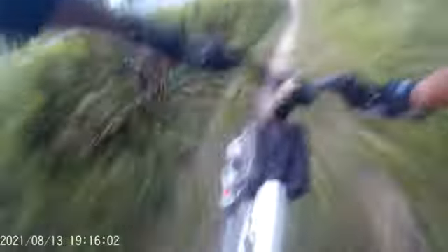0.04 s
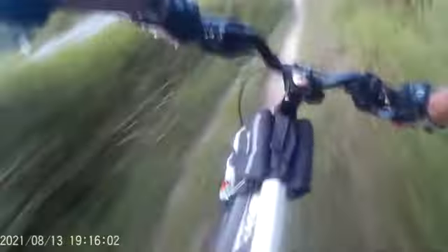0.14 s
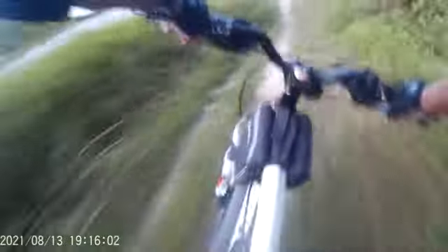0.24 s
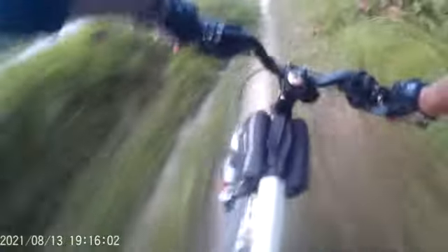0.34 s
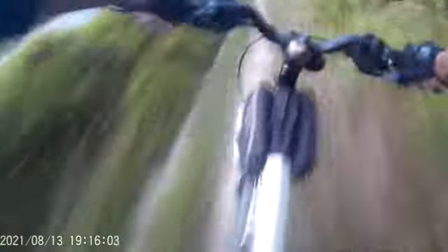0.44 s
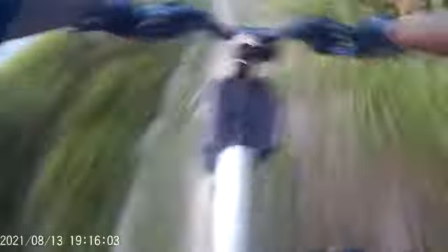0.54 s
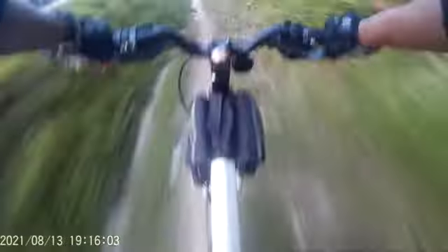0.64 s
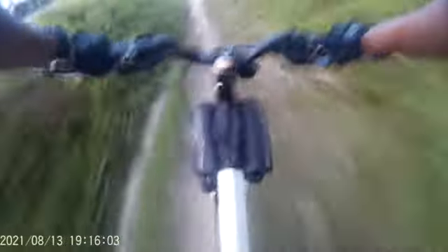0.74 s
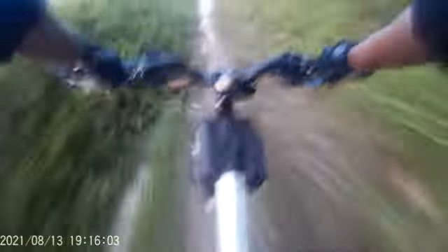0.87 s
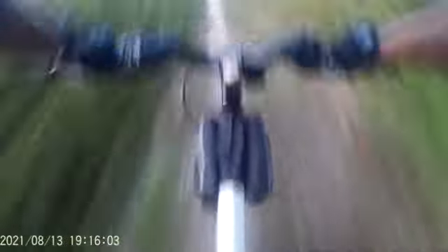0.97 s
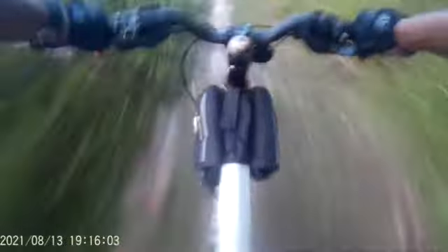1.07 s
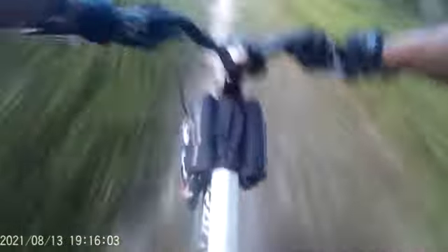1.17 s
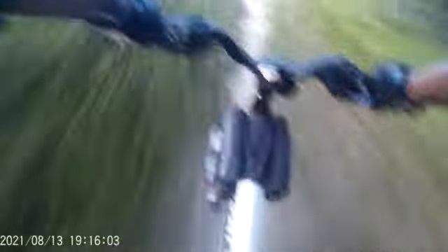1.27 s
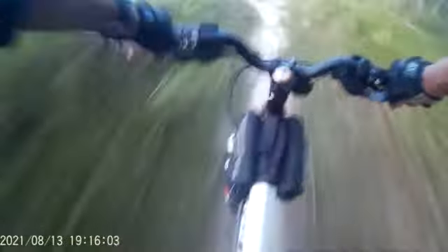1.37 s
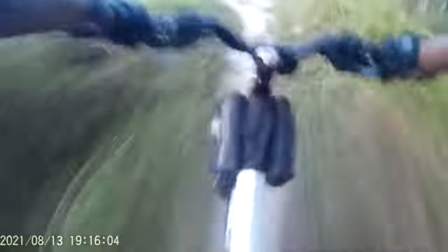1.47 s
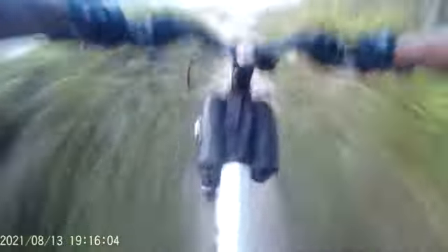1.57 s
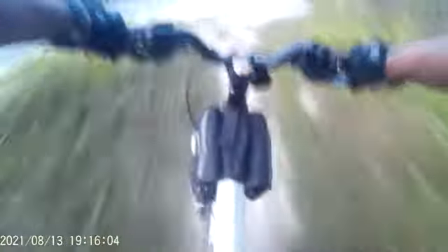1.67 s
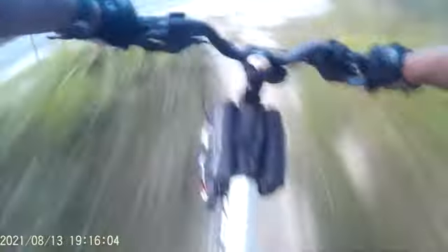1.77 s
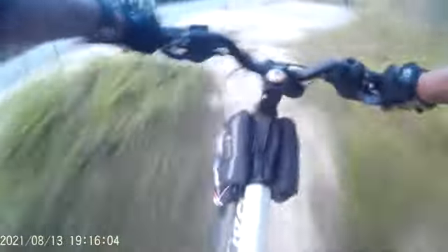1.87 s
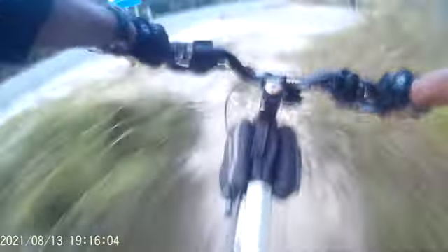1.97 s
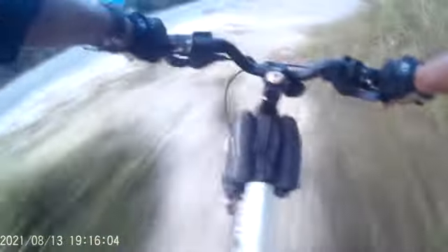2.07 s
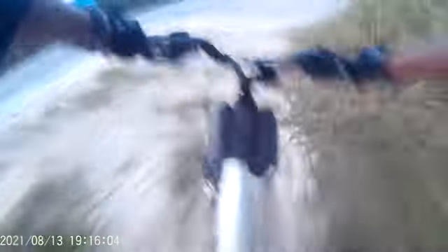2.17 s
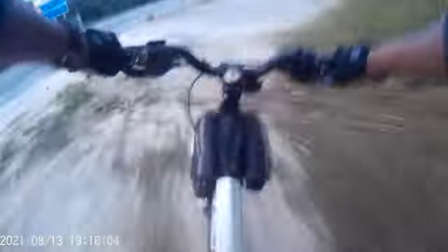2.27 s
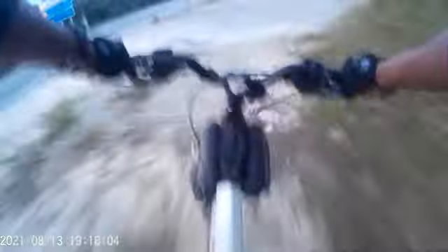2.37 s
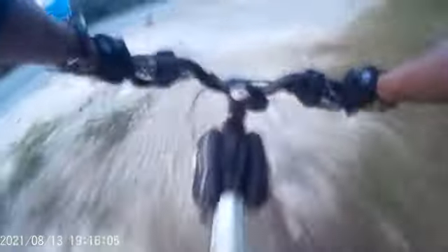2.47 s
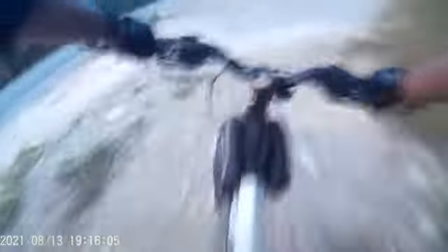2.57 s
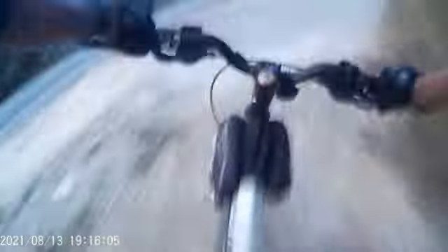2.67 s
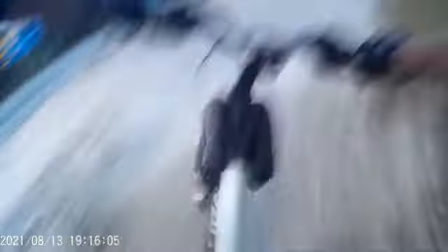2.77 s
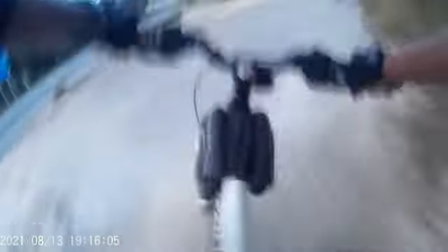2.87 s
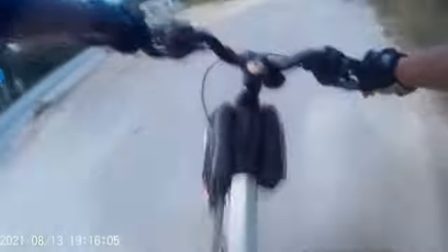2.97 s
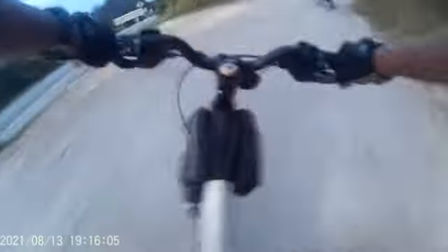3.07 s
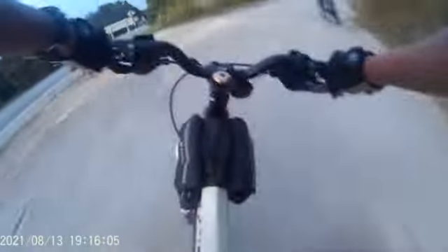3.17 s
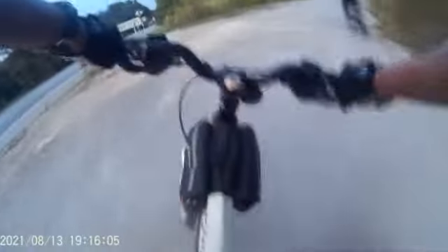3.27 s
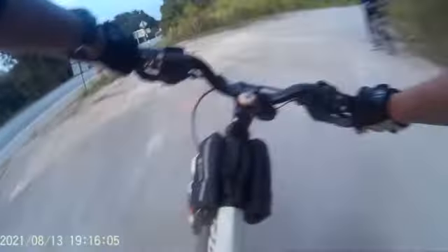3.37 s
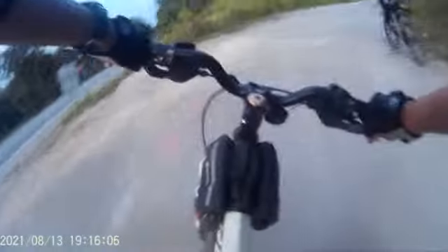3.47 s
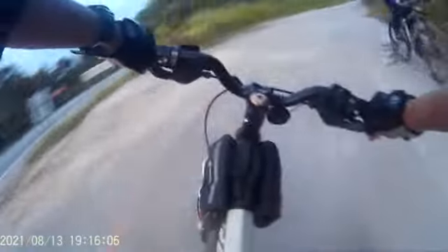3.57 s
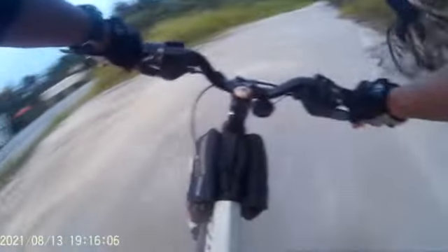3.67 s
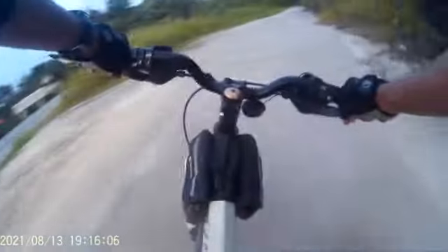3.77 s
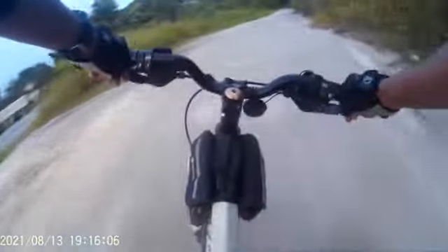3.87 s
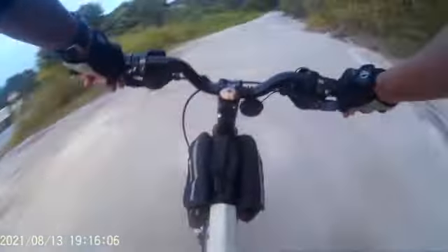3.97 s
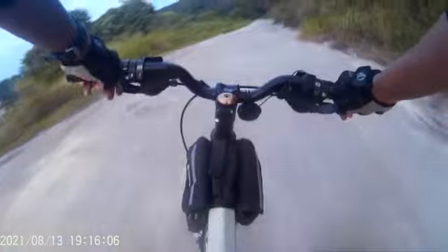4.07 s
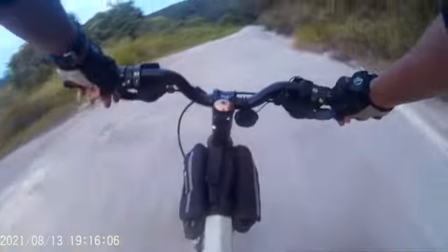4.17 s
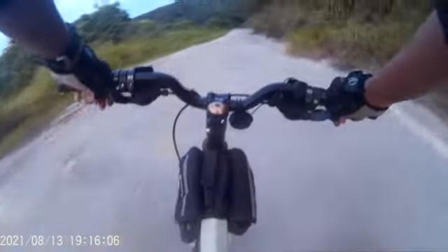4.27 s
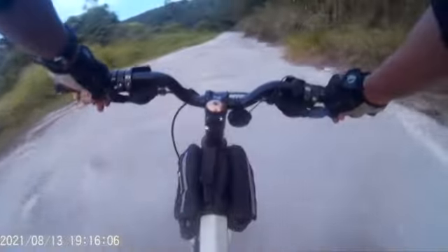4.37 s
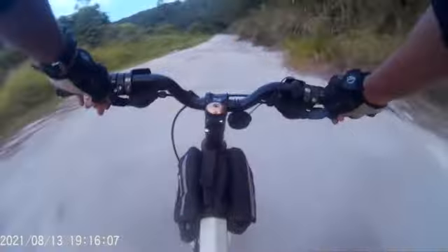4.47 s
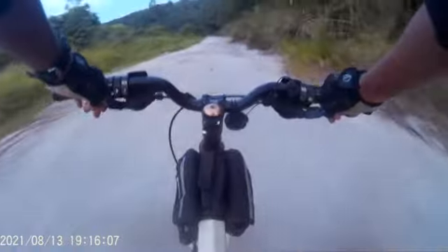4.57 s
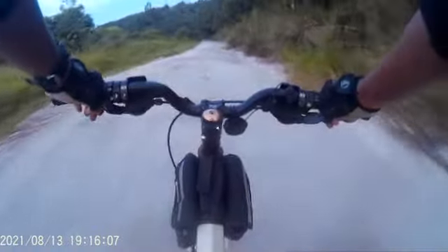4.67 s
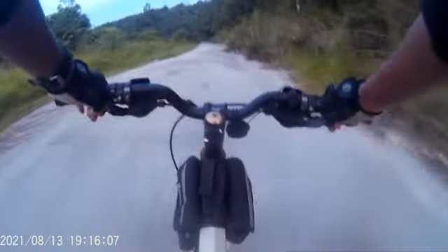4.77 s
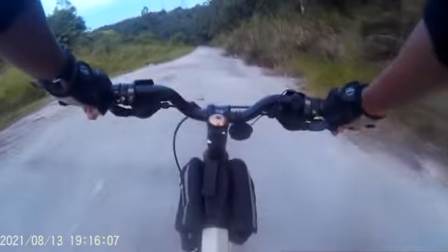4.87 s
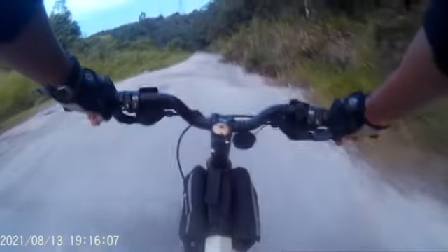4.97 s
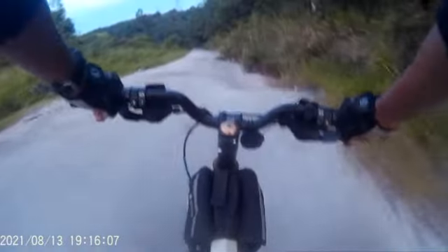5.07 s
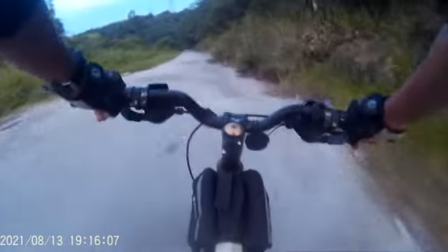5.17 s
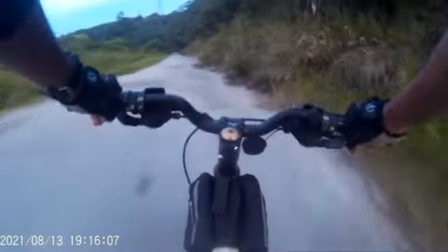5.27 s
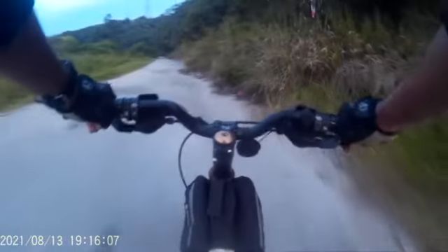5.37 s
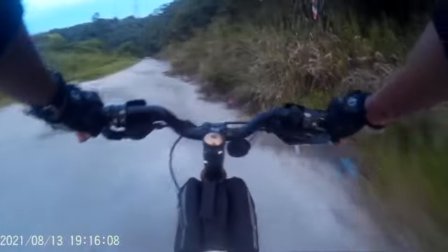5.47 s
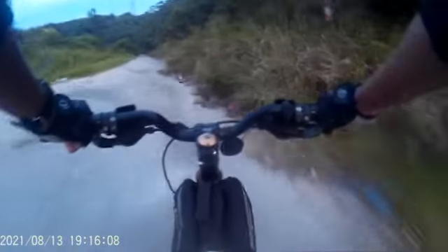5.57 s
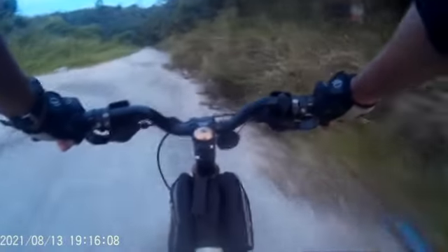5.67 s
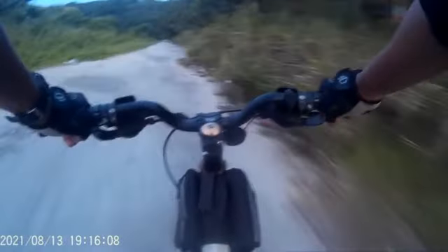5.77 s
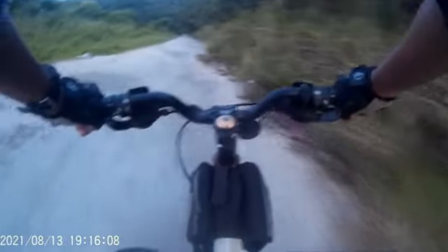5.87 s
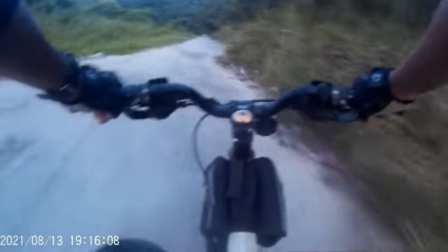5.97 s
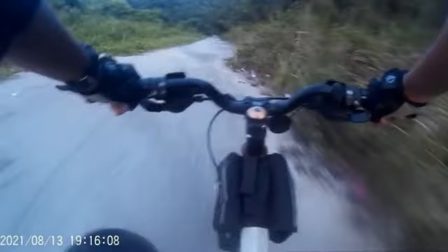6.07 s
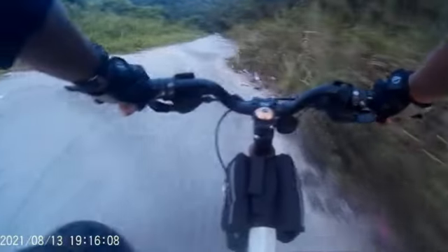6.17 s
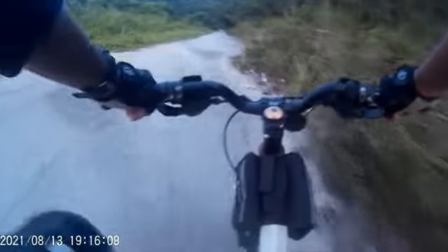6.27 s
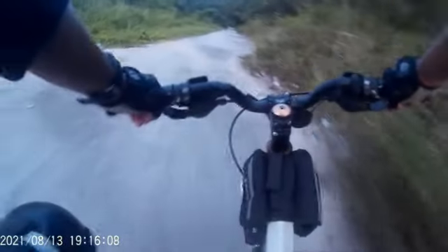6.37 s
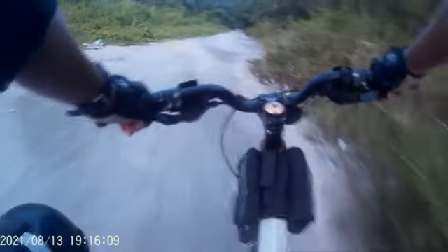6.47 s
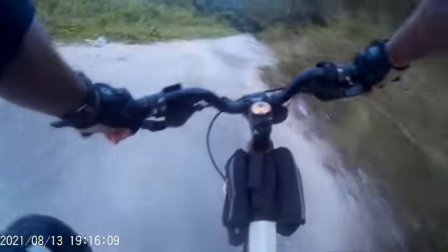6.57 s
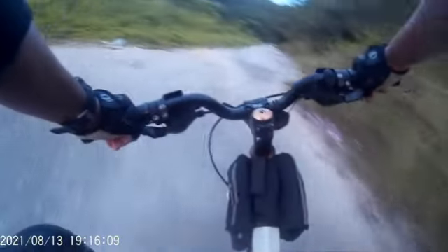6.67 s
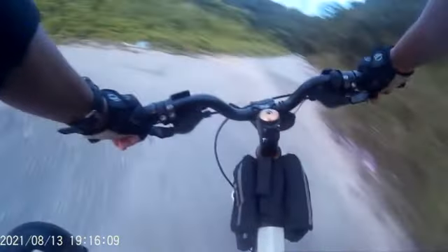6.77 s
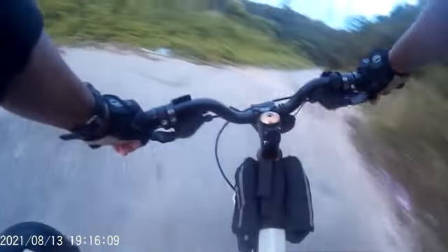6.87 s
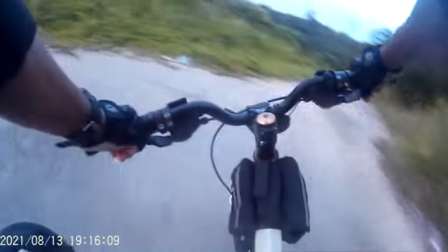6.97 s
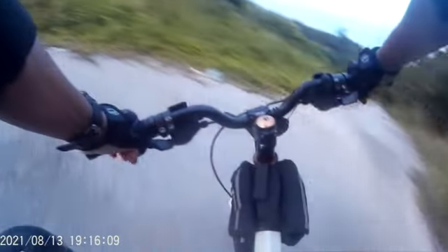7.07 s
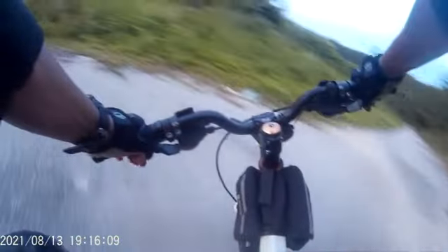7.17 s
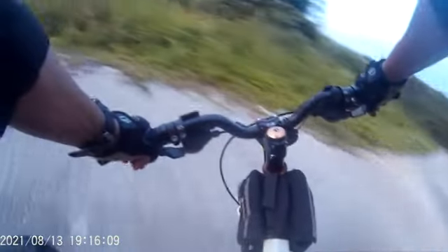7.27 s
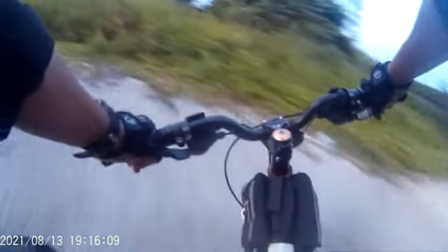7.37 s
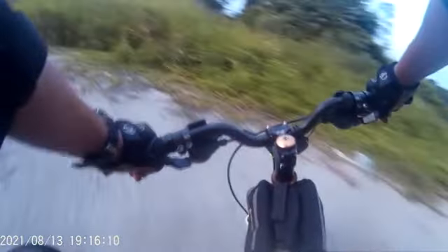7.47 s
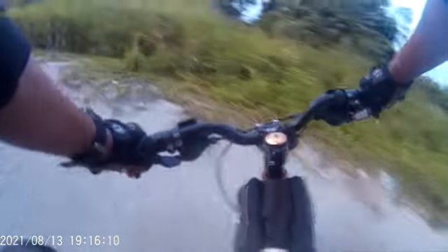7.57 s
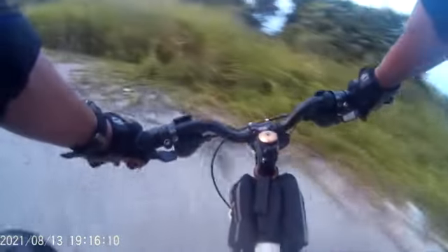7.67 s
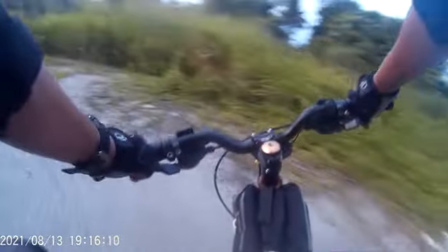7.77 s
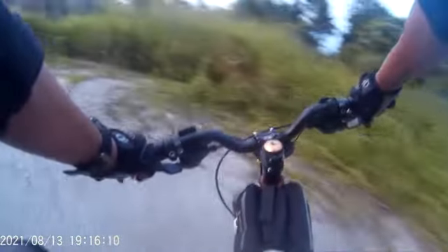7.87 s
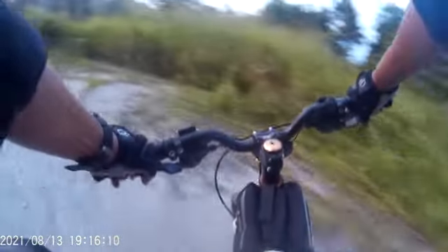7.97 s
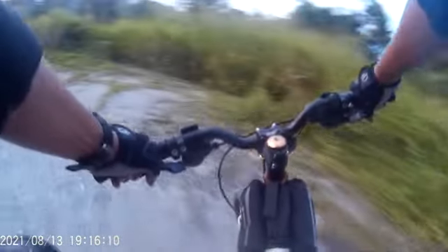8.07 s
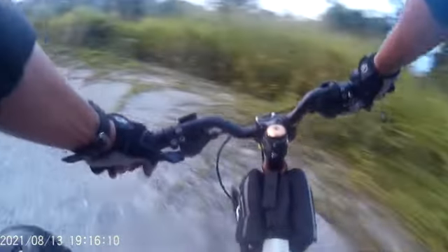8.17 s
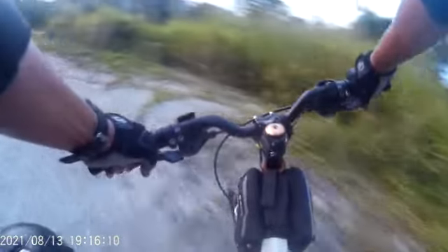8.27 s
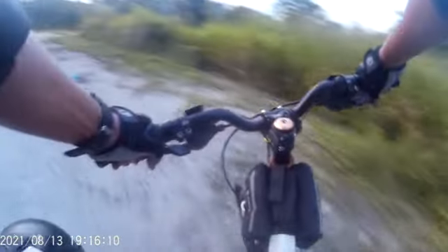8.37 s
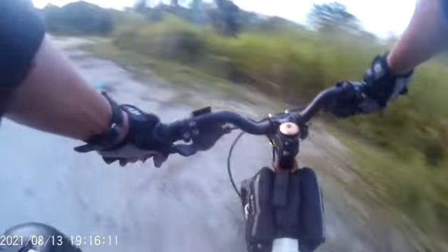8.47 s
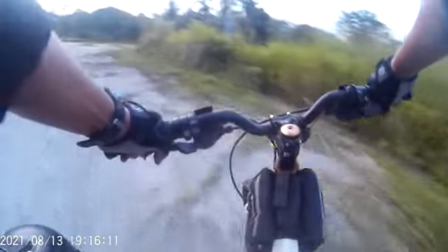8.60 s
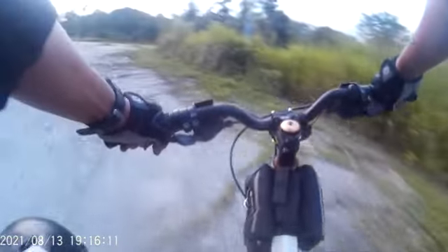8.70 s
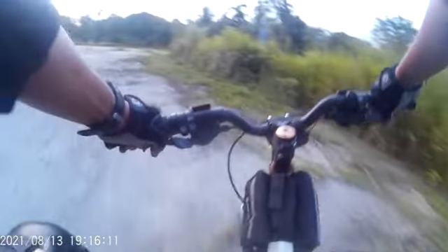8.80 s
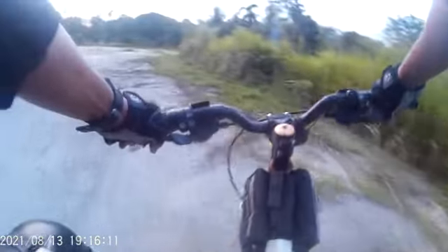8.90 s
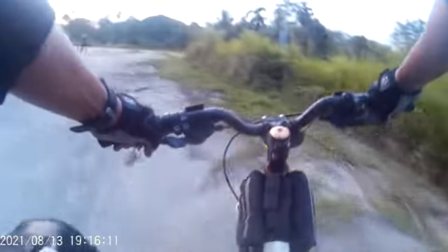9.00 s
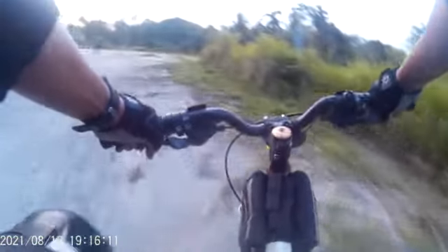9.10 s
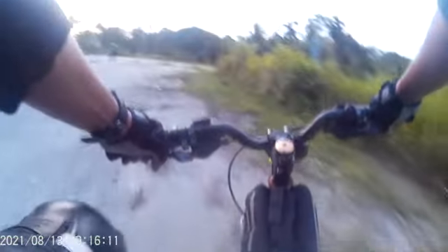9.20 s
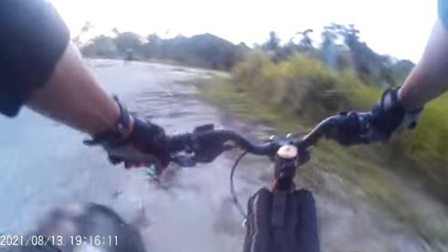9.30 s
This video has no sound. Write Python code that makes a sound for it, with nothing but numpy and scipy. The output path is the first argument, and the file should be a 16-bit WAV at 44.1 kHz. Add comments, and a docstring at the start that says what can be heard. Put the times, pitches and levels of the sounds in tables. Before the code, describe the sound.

A mountain bike runs down a rough dirt trail, heard from a camera on the rider's chest. Wind buffets the microphone while low thumps, hollow knocks and small chain snaps sound over the dull rush of tyres on grit. After about four seconds the thumps stop and the wind dies down. The bike rolls more quietly on concrete, with light knocks, ticking chain and a faint rubbing.

```python
"""A mountain bike runs down a rough dirt trail, then slows on concrete.
Its tyres rush over grit, its chain and cables snap, and bumps and stones knock. A camera on the
rider's chest hears it all through a case, which rings briefly at each knock and is buffeted by wind.
A thin insect-like whine and a faint hum come and go over the hiss of the microphone's amplifier."""
import sys
import numpy as np
from scipy import signal
from scipy.fft import rfft, irfft, next_fast_len
from scipy.io import wavfile
from scipy.ndimage import uniform_filter1d

SR = 44100
rng = np.random.default_rng(int(sys.argv[2]) if len(sys.argv) > 2 else 0)


def transcribe(signal):
    """Save signal, clipped to [-1, 1], as a 16-bit WAV file at the path in sys.argv[1]."""
    frames = np.atleast_2d(signal).T
    limited = np.clip(frames, -1, 1)
    pcm = np.round(limited * 32767).astype(np.int16)
    wavfile.write(sys.argv[1], SR, pcm)


N = 411894


# how loud and bright the rolling tyres are: t/s, level/dB, brightness/(dB per octave)
ROLLING = [(0.0, -47, -7), (0.36, -41, -8), (0.55, -48.5, 2), (1.06, -45.5, 6), (2.5, -42.5, -4),
           (2.7, -37.5, -14), (2.88, -45, 5), (3.28, -52, 25), (3.72, -43.5, 7), (4.16, -49, 12),
           (4.92, -48, -1), (6.11, -47.5, 10), (7.36, -49.5, -9), (7.86, -52, -9), (8.19, -49.5, -10),
           (8.43, -45.5, -15), (8.92, -47, 4), (9.34, -41, -7)]
# how much loose gravel pops under the tread: t/s, level/dB
GRAVEL = [(0, -3), (2.9, 0), (3.3, -1), (5.4, 1), (7.4, -5.5), (7.5, -21), (8.15, -34), (8.25, -10),
          (9.34, -3)]
# the broad pitch ranges that the case lets through: f/Hz, level/dB, width/Hz
RUSH_BANDS = [(774, -6.5, 340), (1093, 5.5, 825), (1394, -4.5, 550), (1610, -3.5, 590), (1850, -14, 430)]
# the tone of crackling gravel: f/Hz, level/dB
CRACKLE_TONE = [(600, 11), (1300, 4.5), (2000, -8), (2600, 0.5), (3600, 0.5), (4200, -1), (4700, -9),
                (8000, -17), (15000, -37)]

def tyres():
    """Rolling tyres rush, dulled by the case; gravel popping under the tread feeds rush and crackle."""
    rush_db, bright_db = curves(ROLLING)
    gravel = grains(per_s=90, spread_db=3.5, length_s=0.0041) * undb(curves(GRAVEL)[0])
    contact = (rng.standard_normal(N) + undb(0.5) * gravel) * undb(wander(18))
    rush = np.zeros(N)
    for hz, db, width in RUSH_BANDS:
        band_db = db + bright_db * np.log2(hz / 1300) + 0.22 * wander(47)
        rush += undb(band_db) * unit(band(band(contact, hz, width), hz, width))
    closed_case = signal.butter(4, 1774, fs=SR, output="sos")
    rush = signal.sosfilt(closed_case, rush / np.sqrt(len(RUSH_BANDS)))
    crackle = colour(gravel + undb(1) * rng.standard_normal(N), CRACKLE_TONE)
    crackle_db = -14 + 0.18 * bright_db  # a brighter rush crackles more
    return undb(rush_db) * (rush + undb(crackle_db) * crackle)


# patches of loose stones: start/s, end/s, level/dB
SCRAPES = [(1.347, 1.393, -40), (1.471, 1.515, -36), (2.527, 2.61, -45.5), (2.612, 2.8, -47)]
# the tone of their crunch: f/Hz, level/dB
CRUNCH_TONE = [(500, -23), (900, 7), (1800, 1), (2300, -17), (4000, -14.5), (8000, -24.5), (16000, -40)]

def scrapes():
    """A tyre ploughs through stones: a crunch of tiny contacts starts at once and tapers off."""
    t = np.arange(N) / SR
    crunch = colour(grains(per_s=1100, spread_db=1.5, length_s=0.0025), CRUNCH_TONE)
    level = np.zeros(N)
    for start, end, db in SCRAPES:
        taper = np.sqrt(np.clip((end - t) / (end - start), 0, 1))
        level += undb(db) * spell(start, np.inf, fade_s=0.004) * taper
    return level * crunch


# knocks from bumps and stones: t/s, level/dB, centre/Hz, boost of the low notes/dB
KNOCKS = [(0.3418, -27, 1040, 0), (0.4674, -23, 900, -12), (0.794, -35, 1020, 6), (0.829, -16.5, 1090, 0.5),
          (0.956, -29.5, 1000, -4), (1.3484, -30.5, 1190, -14), (1.387, -25.5, 1220, -28),
          (1.4751, -27, 926, -2.5), (1.4873, -22, 1030, -17), (1.513, -25, 902, -11),
          (1.94, -26.5, 1020, -0.5), (2.0218, -24, 1810, 6), (2.1145, -26.5, 1020, -5),
          (2.2142, -20, 1040, -7.5), (2.589, -23.5, 1120, -8), (2.6297, -25.5, 1460, -17),
          (2.6448, -20.5, 1060, -2), (2.7512, -26.5, 1620, 2), (2.846, -28.5, 910, -8),
          (3.1096, -27, 926, -3), (3.2681, -29.5, 1780, -1), (3.401, -30, 1066, -20),
          (4.6465, -29, 1180, -3), (4.8533, -29, 1030, -3), (4.8763, -29.5, 1060, -9),
          (4.9874, -34.5, 1660, -17), (5.323, -32, 1140, -10), (5.3538, -24.5, 1204, -9),
          (5.404, -31.5, 1160, -5.5), (5.616, -31.5, 1590, -8.5), (5.8453, -31.5, 1240, -18),
          (6.114, -34, 1800, -19), (6.134, -27.5, 1530, -20), (6.381, -32.5, 1410, -22),
          (6.793, -29, 1480, -31), (6.819, -32.5, 1460, -20), (7.15, -33.5, 1200, -8),
          (7.256, -37, 1500, -10), (7.313, -34, 1500, -12), (7.345, -33, 1150, -14),
          (7.441, -34.5, 1453, -21), (8.205, -34.5, 1626, -4.5), (8.212, -31.5, 1630, -11),
          (8.477, -33.5, 1590, -8), (6.961, -37, 1850, -19), (8.3487, -30, 1100, -11),
          (8.373, -33, 1250, -12), (8.4033, -25.5, 1510, -12), (8.5444, -29.5, 1590, -16),
          (9.0986, -23, 1025, -9.5), (9.185, -30, 1800, -16), (8.508, -35.5, 1500, -11),
          (8.6038, -36, 1700, -12), (8.718, -39, 1500, -16), (9.044, -36, 2000, -18),
          (9.162, -31, 1900, -20), (9.2542, -37, 1700, -15)]
# the notes the case rings with: f/Hz, level/dB, time to fade by 60 dB/s
CASE_NOTES = [(358, 4.5, 0.0079), (493, 1.5, 0.011), (707, -13, 0.035), (1110, -5.5, 0.021),
              (1400, 3, 0.0046), (1605, -5, 0.017), (1800, -7, 0.026)]

def knocks():
    """Each knock is a tiny rattle that cracks and rings the case, a little differently each time."""
    t = np.arange(2048) / SR
    hz, db, ring_s = np.transpose(CASE_NOTES)[:, :, None]
    fade = undb(-60 * t / ring_s) * (1 - np.exp(-t / 0.0021))
    jolts = rng.standard_normal((len(KNOCKS), 256)) * t[:256] * np.exp(-t[:256] / 0.0007)
    chance = rng.standard_normal((len(KNOCKS), 2, len(CASE_NOTES), 1))
    crack_band = signal.butter(4, [750, 2430], "band", fs=SR, output="sos")
    events = []
    for (s, level_db, centre_hz, low_db), jolt, (louder, higher) in zip(KNOCKS, jolts, chance):
        notes = np.sin(2 * np.pi * hz * (1 + 0.04 * higher) * t) * fade
        rings = signal.fftconvolve(notes, jolt[None], axes=1)
        rings /= np.abs(rings).max(axis=1, keepdims=True)
        near_db = -12 * np.abs(np.log2(hz / centre_hz))  # weaker away from the knock's centre
        boost_db = np.where(hz < 800, low_db, near_db)
        sound = np.sum(undb(db + boost_db + 1.5 * louder) * rings, axis=0)
        crack = signal.sosfilt(crack_band, jolt)
        sound[:len(crack)] += undb(-11.5) * crack / np.abs(crack).max()
        events.append((s, undb(level_db) * sound))
    bass_cut = signal.butter(2, 200, "high", fs=SR, output="sos")  # a small case makes no deep bass
    return signal.sosfilt(bass_cut, place(events))


# bumps felt through the frame: t/s, level/dB, f/Hz
THUMPS = [(0.375, -8, 150), (0.457, -1, 229), (0.49, -5, 133), (0.661, -7, 184), (1.23, -7.5, 185),
          (2.757, -6.5, 137), (2.988, -12, 205), (3.105, -5.5, 128), (3.283, -1.5, 192), (3.738, -7.5, 119),
          (4.004, -8, 241)]

def thumps():
    """A bump comes through the frame as one or two slow pressure waves with a soft start."""
    t = np.arange(4096) / SR
    events = []
    for s, db, hz in THUMPS:
        cycles = hz * t
        swell = cycles * np.exp(1 - cycles / 0.39) / 1.28
        events.append((s, undb(db) * swell * np.sin(2 * np.pi * cycles)))
    return place(events)


# snaps of chain and cables: t/s, level/dB, brightness/(dB per octave)
SNAPS = [(0.467, -35, -2), (0.683, -44, -6), (1.517, -42, -10), (1.94, -38, -11), (2.135, -43.5, -10),
         (2.443, -48, -6), (2.877, -53, 10), (3.27, -59, -29), (5.8452, -52, -12), (6.134, -49, -21),
         (6.369, -54, -15), (6.196, -55, -19), (8.289, -54.5, -20), (8.403, -42, 15), (8.546, -50, -6),
         (9.1, -45, -13)]
# the notes the metal rings with: f/Hz, level/dB, time to fade by 60 dB/s
METAL_NOTES = [(2050, 4, 0.015), (2540, 5, 0.011), (3820, 10, 0.0059), (4550, 1.5, 0.011),
               (5630, 1, 0.0076), (7940, -16.5, 0.011)]

def snaps():
    """One sudden blow rings a few brief metal notes, tuned a little differently each time."""
    t = np.arange(1024) / SR
    hz, db, ring_s = np.transpose(METAL_NOTES)[:, :, None]
    rise = 1 - np.exp(-t / 0.00077)
    events = []
    for s, level_db, bright_db in SNAPS:
        tuning = 1 + 0.03 * rng.standard_normal(hz.shape)
        fade = undb(db + bright_db * np.log2(hz / 3800) - 60 * t / ring_s)
        notes = fade * np.sin(2 * np.pi * hz * tuning * t)
        events.append((s, undb(level_db) * rise * notes.sum(axis=0)))
    return place(events)


# a loose metal part: t/s, level/dB, f/Hz, time to fade by 60 dB/s
PING = [(1.4033, -20, 2510, 0.017)]

def ping():
    """A loose metal part gives one short, clean ring."""
    t = np.arange(4096) / SR
    rise = 1 - np.exp(-t / 0.0017)
    return place((s, rise * undb(db - 60 * t / ring_s) * np.sin(2 * np.pi * hz * t))
                 for s, db, hz, ring_s in PING)


# stretches of loose grit: start/s, end/s, level/dB, sharp part over dull part/dB
GRIT = [(1.879, 2.304, -51.5, -14), (4.193, 5.553, -54, -26), (6.604, 7.455, -55.5, -11),
        (8.202, 9.301, -56, -29)]
# bursts of chain chatter: start/s, end/s, level/dB
CHAIN_CHATTER = [(5.577, 5.666, -52.5), (5.711, 5.741, -50), (5.776, 5.867, -51), (5.903, 5.938, -50),
                 (5.972, 6.072, -51), (6.108, 6.196, -50), (6.235, 6.294, -53), (6.339, 6.426, -52)]

def frame_ticks():
    """Grit and chain links hit the frame at random, making many small ticks and a few bigger ones."""
    chain = [(*row, -30) for row in CHAIN_CHATTER]  # its sharp part is 30 dB weaker
    ticks = []
    for table, per_s, length_s in [(GRIT, 70, 0.005), (chain, 200, 0.0035)]:
        for start, end, db, sharp_db in table:
            for when, size in rng.random((int(per_s * (end - start)), 2)):
                tick_db = db - 2.8 * np.log(1 - 0.9 * size)
                ticks.append((start + when * (end - start), tick_db, sharp_db, length_s))
    return rough_bursts(ticks)


# things brushing by: t/s, level/dB, sharp part over dull part/dB
BRUSHES = [(0.342, -46.5, -5), (0.966, -56, -2), (1.402, -45, -8), (1.436, -56, -2), (2.534, -57, -3),
           (2.637, -53, -5), (2.66, -53, -3), (2.69, -58, -3), (2.72, -57, -6), (2.753, -52, -5),
           (3.398, -51, -33), (4.108, -47, -24), (4.2, -48, -21), (4.42, -49, -25), (4.647, -46, -18),
           (4.977, -43.5, -23), (5.151, -43, -26), (5.203, -43, -23), (5.399, -41.5, -32),
           (5.619, -43.5, -28), (5.84, -48, -30), (6.112, -47, -26), (6.576, -49, -26), (8.37, -50, -10)]

def brushes(length_s=0.022):
    """Grass, grit and cables brush by, each with a short swell of rough hiss."""
    return rough_bursts([(*row, length_s) for row in BRUSHES])


# wind on the case: t/s, level/dB, big swirls over small ones/dB
WIND = [(0.0, -38, 6.5), (0.31, -35, -5.5), (0.47, -24.5, -1), (0.6, -32, 7), (0.645, -37, 4.5),
        (0.72, -37, 3), (0.83, -33, 4), (0.93, -40, 7.5), (1.27, -33.5, 2.5), (1.92, -35.5, 0.5),
        (2.26, -33, 5), (2.68, -32, -6.5), (2.76, -27.5, 1.5), (2.945, -37, 11.5), (2.975, -41, 2),
        (3.09, -36.5, 7), (3.28, -34.5, 2), (3.45, -36, 2.5), (3.9, -31.5, 2), (4.12, -37.5, 3),
        (4.24, -38, -12), (5.31, -41.5, 0.5), (5.44, -46, -11), (6.22, -54, 3), (7.4, -55.5, 0),
        (8.0, -54, 1.5), (8.79, -54, -5.5), (9.34, -48.5, -6)]
# the tone of deep buffeting: f/Hz, level/dB
BUFFET_TONE = [(15, -32), (30, 0), (60, 11), (110, 9.5), (170, 3.5), (300, -18.5), (900, -86)]
# the tone of low flutter: f/Hz, level/dB
FLUTTER_TONE = [(80, -3.5), (150, 7.5), (250, 8), (380, -3), (700, -22), (1500, -81)]
# the tone of lighter rustle: f/Hz, level/dB
RUSTLE_TONE = [(200, -17), (350, -0.5), (550, -2.5), (800, -7.5), (1200, -16.5), (3000, -101)]

def wind():
    """Swirls of air push on the case in shared puffs: big ones thump, small ones flutter and rustle."""
    wind_db, big_db = curves(WIND)
    puff = wander(30) + 1.6 * wander(8.6)
    flicker = wander(80)
    buffet = colour(rng.standard_normal(N) * undb(1.3 * puff), BUFFET_TONE)
    depth = np.where(wind_db > -38, 1, 0.41)  # a weak wind puffs less deeply
    small_swirls = rng.standard_normal(N) * undb(depth * (1.17 * puff + 1.85 * flicker))
    flutter = colour(small_swirls, FLUTTER_TONE)
    rustle = colour(small_swirls, RUSTLE_TONE)
    rustle_db = -16.5 + 0.67 * wind_db  # grows more slowly than the wind
    return undb(wind_db) * (undb(big_db) * buffet + flutter) + undb(rustle_db) * rustle


# spells of rubbing: start/s, end/s, f/Hz, width/Hz, level/dB
RUBS = [(6.504, 7.3, 1584, 260, -56.5), (7.466, 7.635, 1045, 110, -52.5), (7.63, 8.033, 1075, 160, -59),
        (8.164, 8.65, 1530, 200, -54), (8.879, 9.401, 1355, 200, -52)]

def rub():
    """A faint rubbing note, a narrow band of noise, comes and goes as the bike slows."""
    out = np.zeros(N)
    for start, end, hz, width, db in RUBS:
        note = unit(band(band(rng.standard_normal(N), hz, width), hz, width))
        out += undb(db) * spell(start, end, fade_s=0.059) * note
    return out


# spells of whining: start/s, end/s, f/Hz, width/Hz, level/dB
WHINES = [(0, 0.55, 3750, 450, -71), (0.9, 2.8, 3950, 300, -71), (4.05, 5.05, 3960, 110, -73),
          (3.45, 3.94, 3940, 100, -71), (9.15, 9.5, 3650, 70, -72), (8.9, 9.5, 4250, 120, -74),
          (8.3, 8.62, 7900, 120, -80), (9.03, 9.5, 7880, 100, -78)]

def whine():
    """Thin, high bands of noise sound like insects, each flickering and drifting in level."""
    out = np.zeros(N)
    for start, end, hz, width, db in WHINES:
        flicker_db = 1.4 * (wander(17) + wander(4.5))
        note = unit(band(rng.standard_normal(N), hz, width))
        out += undb(db + flicker_db) * spell(start, end, fade_s=0.073) * note
    return out


# how loud the hum is: t/s, level/dB
HUM_LEVEL = [(0, -57), (5.5, -63.5), (6.1, -71), (8.2, -71), (9.34, -68.5)]
# its two notes, an octave apart: f/Hz, level/dB
HUM_NOTES = [(96.9, -1), (193.8, 13)]

def hum():
    """A faint low hum wavers in pitch and level."""
    wavering_time = np.cumsum(1 + 0.025 * wander(6)) / SR
    notes = sum(undb(db) * np.sin(2 * np.pi * hz * wavering_time) for hz, db in HUM_NOTES)
    return np.sqrt(2) * undb(curves(HUM_LEVEL)[0] + 2.2 * wander(10)) * notes


# the tone of the amplifier's hiss: f/Hz, level/dB
HISS_TONE = [(300, 5), (2000, -3), (5000, -4.5), (8000, -5), (14000, -4.5), (16000, -10)]

def hiss():
    """The microphone's amplifier adds a steady, quiet noise."""
    return undb(-64.5) * colour(rng.standard_normal(N), HISS_TONE)


def rough_bursts(rows):
    """Hiss dulled by the case, plus a sharp part, for each row of t/s, level/dB, sharp/dB, length/s."""
    t = np.arange(2048) / SR
    noise = rng.standard_normal((len(rows), 2048))
    noise *= undb(4.5 * np.repeat(rng.standard_normal((len(rows), 32)), 64, axis=1))  # gritty, not even
    dull_band = signal.butter(5, [1500, 4100], "band", fs=SR, output="sos")
    sharp_band = signal.butter(2, [4300, 9000], "band", fs=SR, output="sos")
    dulls = signal.sosfilt(dull_band, band(noise, 1800, 1230))
    sharps = signal.sosfilt(sharp_band, noise)
    events = []
    for (s, db, sharp_db, length_s), dull, sharp in zip(rows, dulls, sharps):
        swell = np.sin(np.pi * np.clip(t / length_s, 0, 1) ** 0.6)
        burst = unit(swell * dull) + undb(sharp_db) * unit(swell * sharp)
        gain = undb(db) * np.sqrt(np.mean(swell ** 2)) / 2
        events.append((s - 0.002, gain * burst))
    return place(events)


def grains(per_s, spread_db, length_s):
    """Random contacts of uneven size, each a short fading burst of noise."""
    hits = rng.random(N) < per_s / SR
    sizes = undb(spread_db * np.minimum(rng.exponential(1, N), 2))
    fades = signal.lfilter([1], [1, -np.exp(-1 / (length_s * SR))], hits * sizes)
    return unit(fades * rng.standard_normal(N))


def undb(db):
    """Turn decibels into a number to multiply by."""
    return 10 ** (np.asarray(db) / 20)


def unit(x):
    """Scale a sound to an average strength (rms) of 1."""
    return x / np.sqrt(np.mean(x ** 2))


def curves(table):
    """Join each column's points with straight lines in time."""
    s, *columns = np.transpose(table)
    return [np.interp(np.arange(N) / SR, s, column) for column in columns]


def wander(per_s):
    """A smooth random drift, about 1 in size, that picks a new value per_s times a second."""
    hold = int(SR / per_s)
    steps = np.repeat(rng.standard_normal(N // hold + 1), hold)
    return 1.147 * uniform_filter1d(uniform_filter1d(steps, hold), hold)[:N]


def colour(x, tone):
    """Shape a sound's lows and highs with a table of f/Hz, level/dB."""
    hz, db = np.transpose(tone)
    size = next_fast_len(N)
    f = np.maximum(np.arange(size // 2 + 1) * SR / size, 1)
    gain = undb(np.interp(np.log(f), np.log(hz), db))
    return unit(irfft(rfft(x, size) * gain, size)[:N])


def band(x, hz, width):
    """Keep the part of a sound near one pitch."""
    return signal.lfilter(*signal.iirpeak(hz, hz / width, SR), x)


def spell(start_s, end_s, fade_s):
    """Swell in, hold, die away."""
    t = np.arange(N) / SR
    return np.clip(np.minimum(t - start_s, end_s - t) / fade_s + 0.5, 0, 1)


def place(events):
    """Lay (start time, sound) pairs on one track."""
    out = np.zeros(N + SR)
    for s, sound in events:
        start = int(s * SR)
        out[start:start + len(sound)] += sound
    return out[:N]


def scene():
    """Wind, bike and background meet at one microphone."""
    air = wind()
    bike = tyres() + scrapes() + knocks() + thumps() + snaps() + ping() + frame_ticks() + brushes()
    return (air + bike + rub() + whine() + hum())[None]


def record(dry):
    """The camera adds its hiss and cuts the very highest treble."""
    treble_cut = signal.ellip(10, 0.2, 80, 15520, fs=SR, output="sos")
    return signal.sosfilt(treble_cut, dry + hiss())


dry = scene()
out = record(dry)
transcribe(out)
```